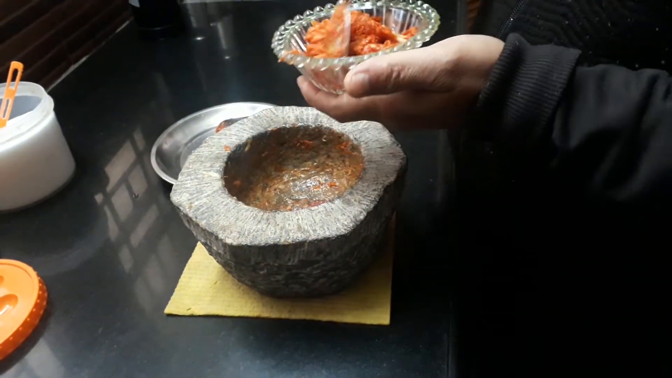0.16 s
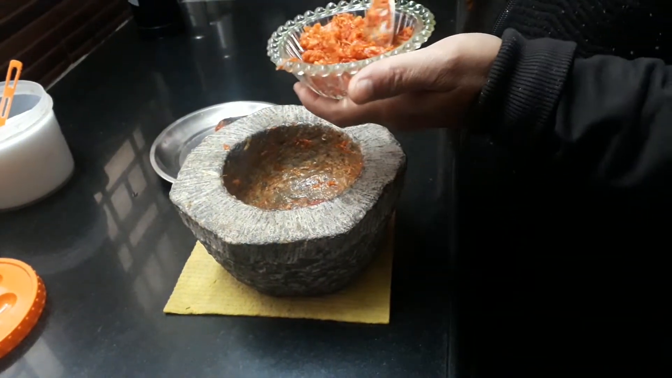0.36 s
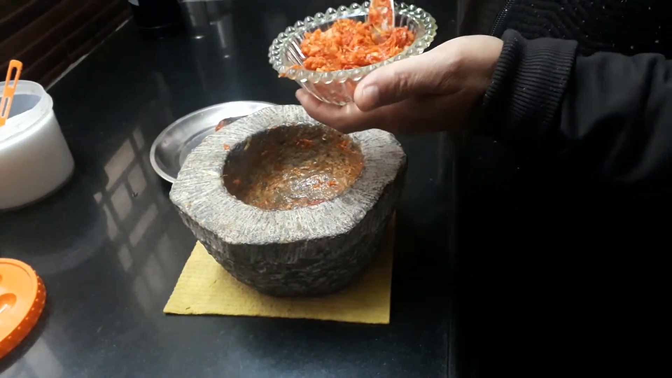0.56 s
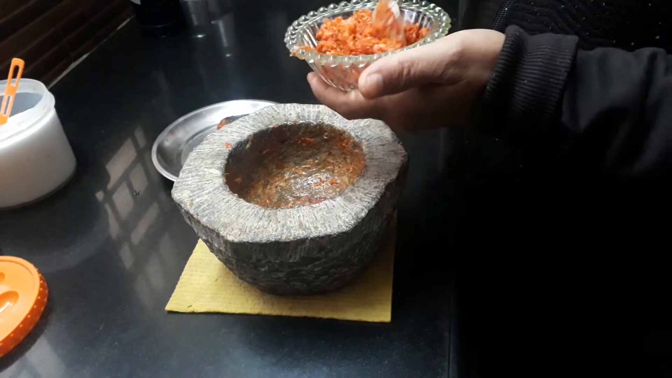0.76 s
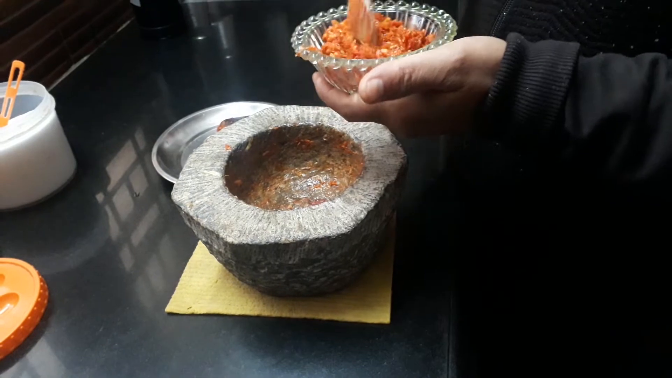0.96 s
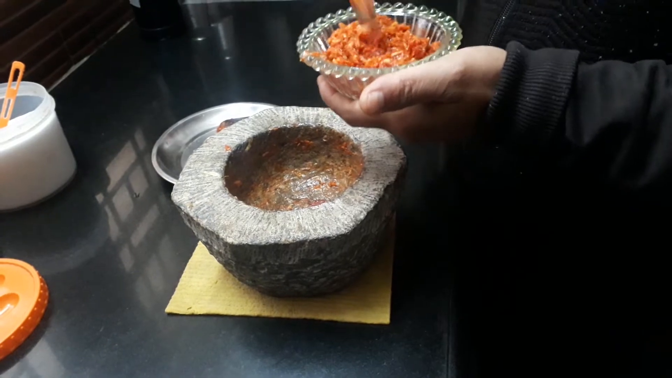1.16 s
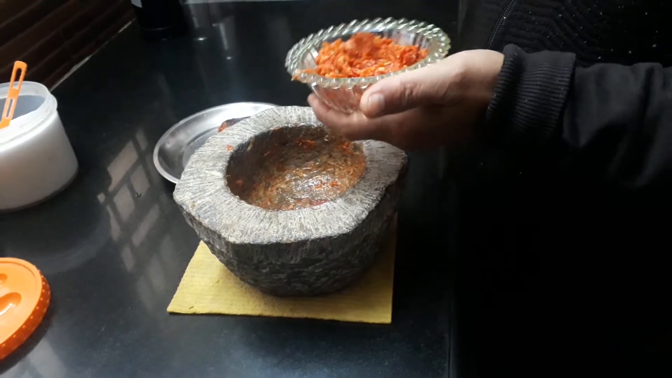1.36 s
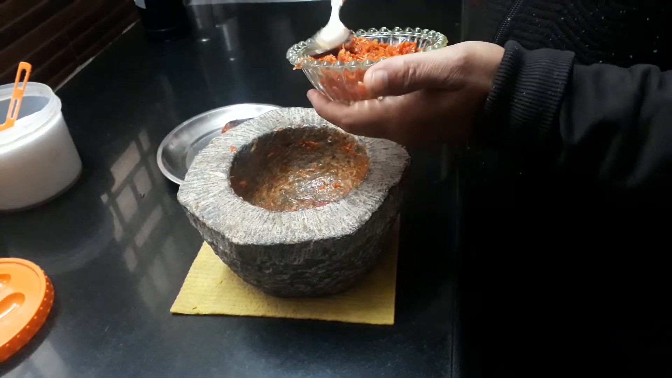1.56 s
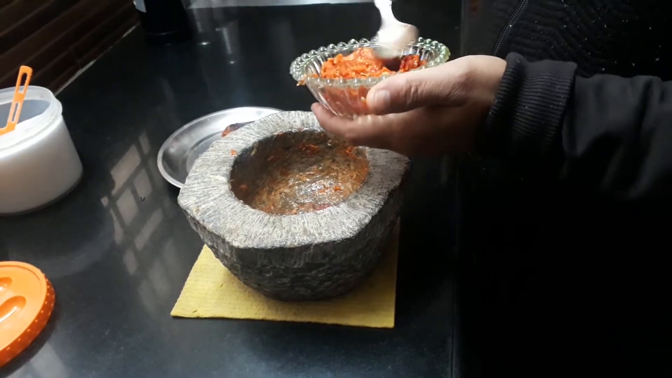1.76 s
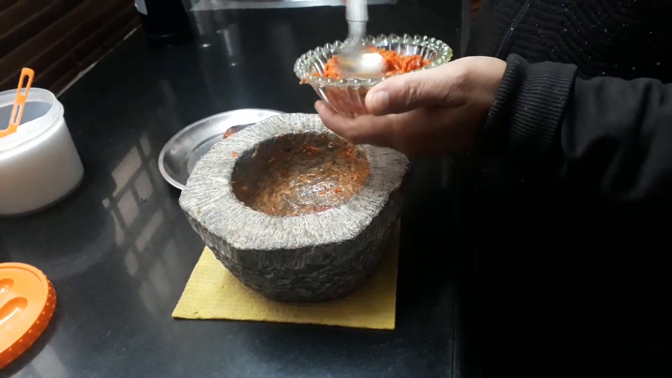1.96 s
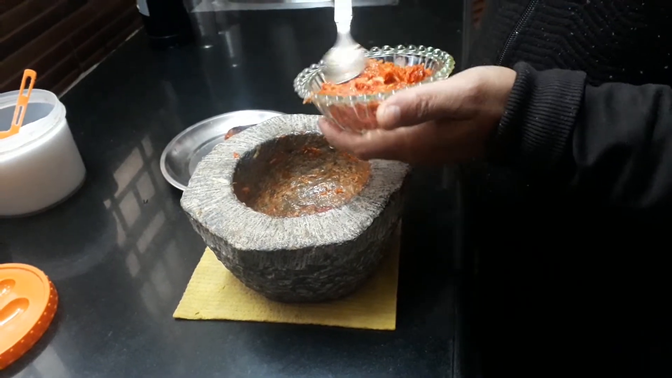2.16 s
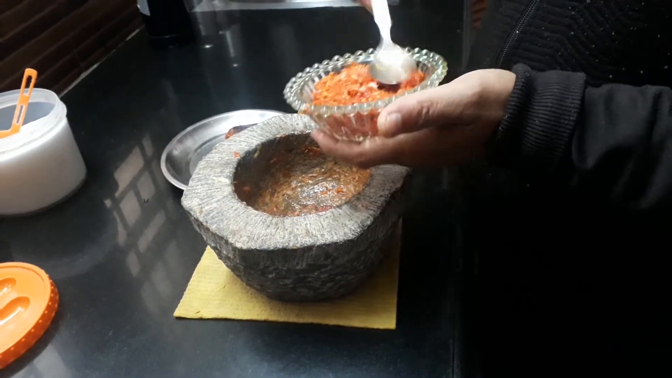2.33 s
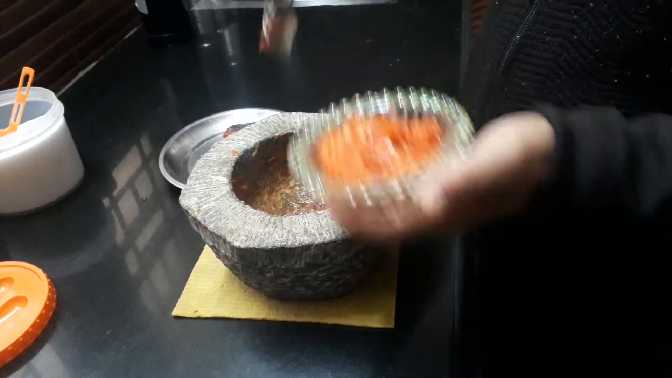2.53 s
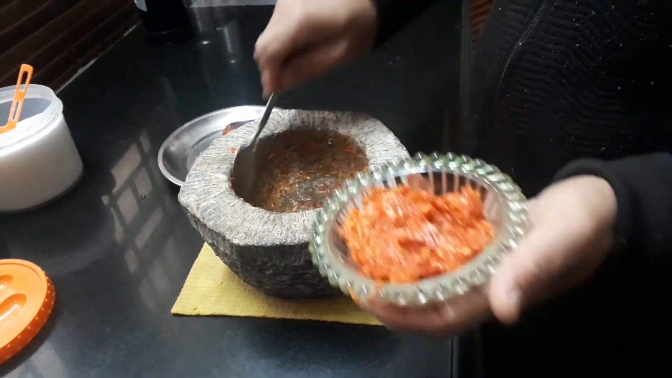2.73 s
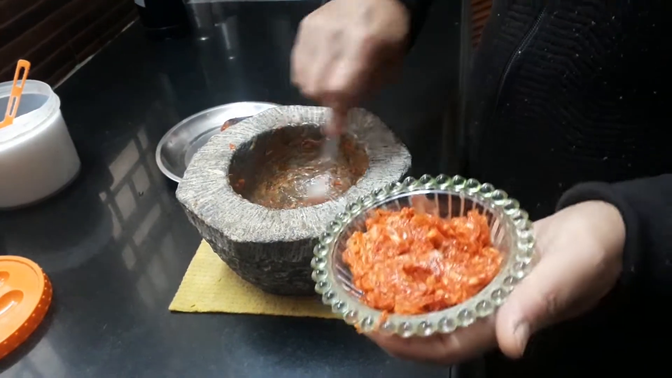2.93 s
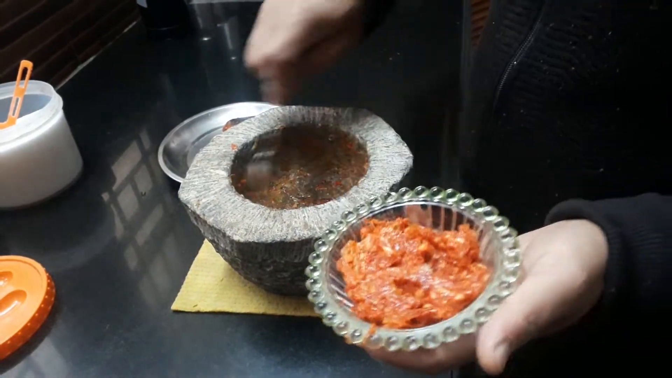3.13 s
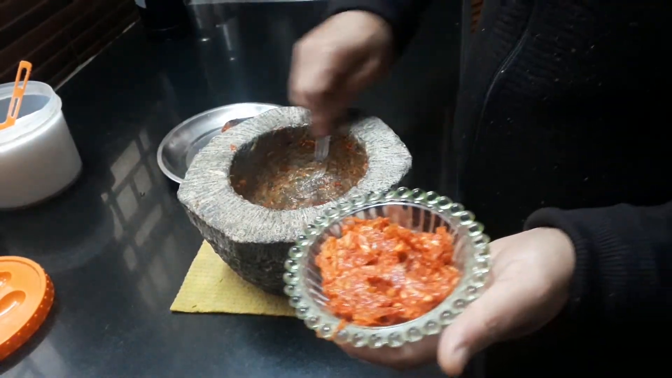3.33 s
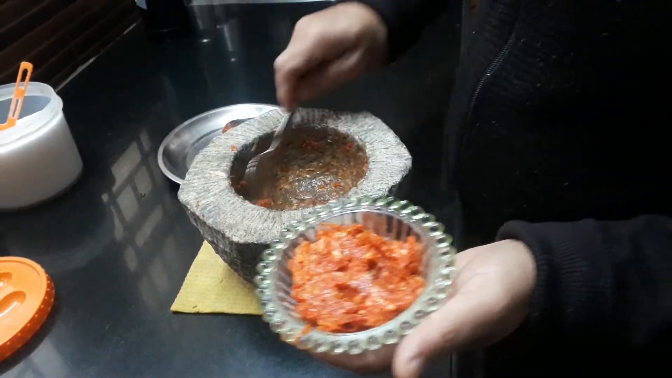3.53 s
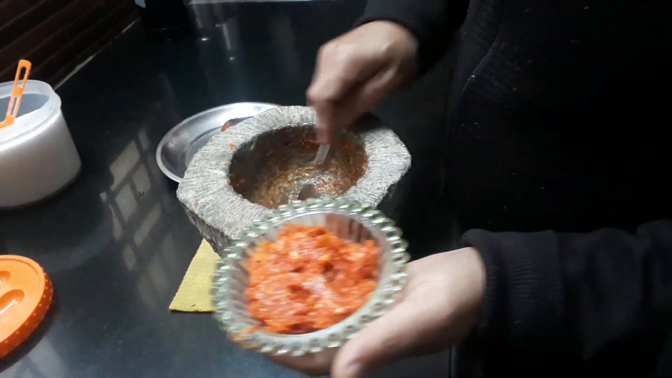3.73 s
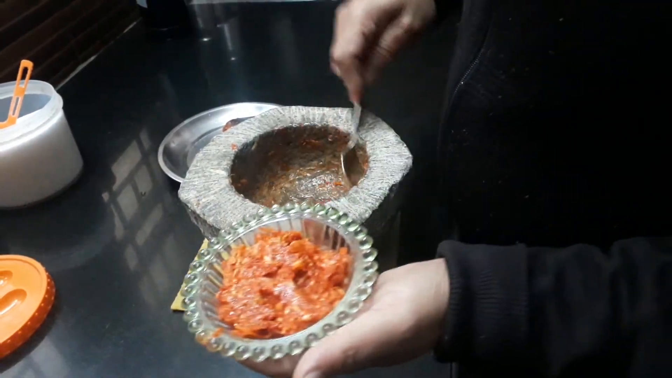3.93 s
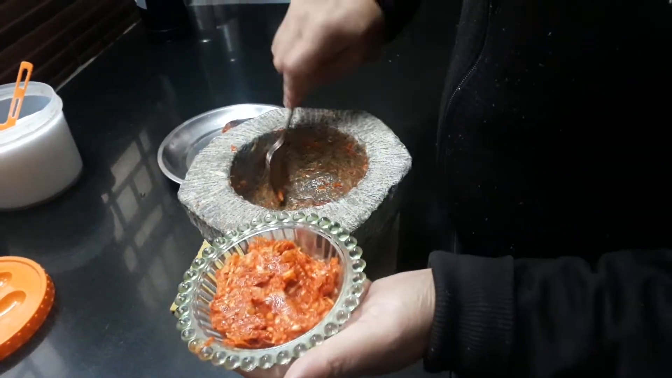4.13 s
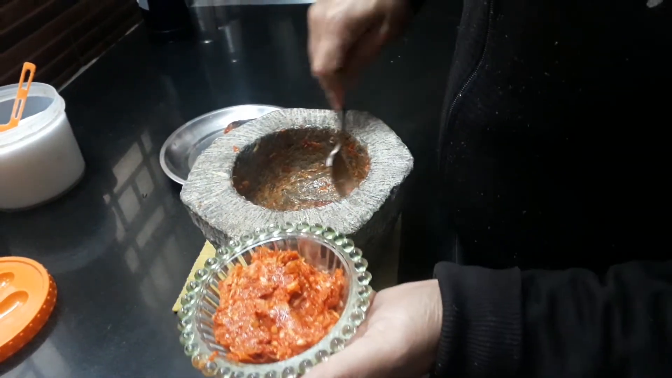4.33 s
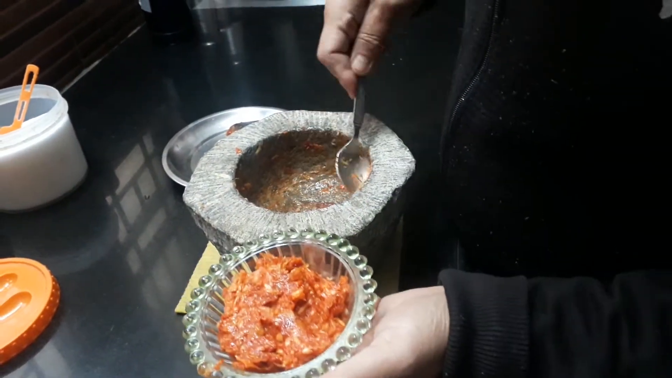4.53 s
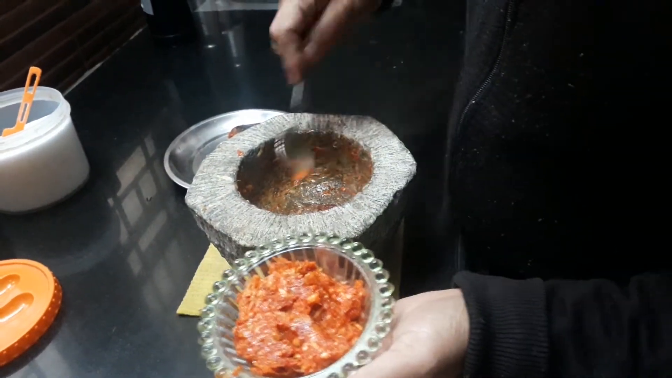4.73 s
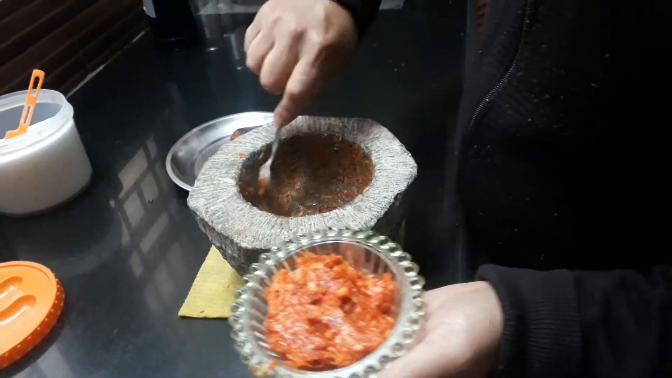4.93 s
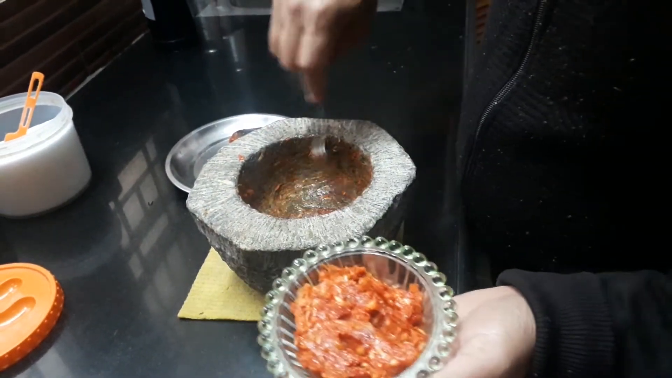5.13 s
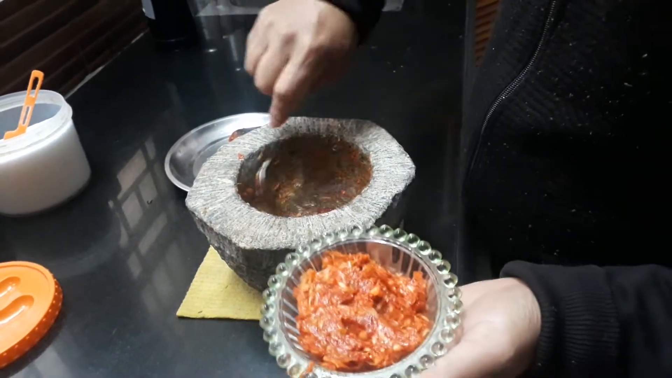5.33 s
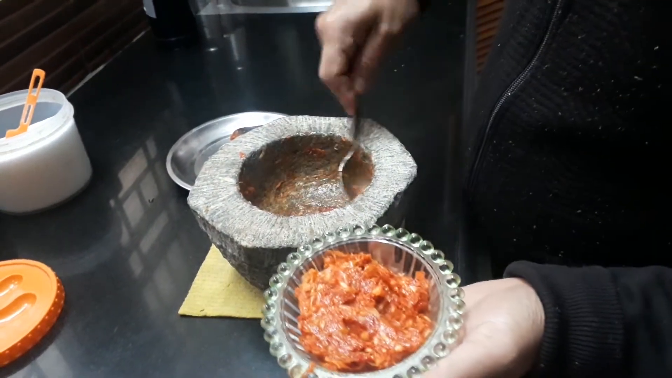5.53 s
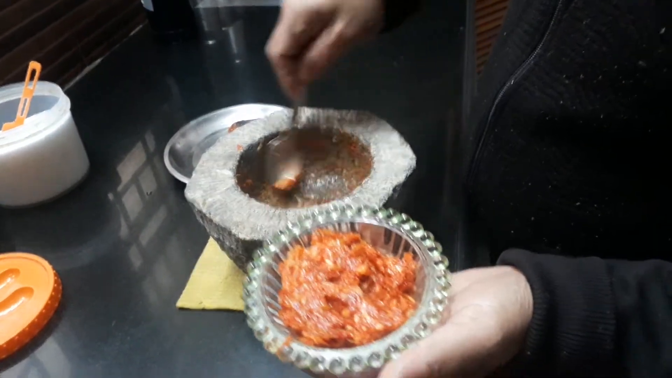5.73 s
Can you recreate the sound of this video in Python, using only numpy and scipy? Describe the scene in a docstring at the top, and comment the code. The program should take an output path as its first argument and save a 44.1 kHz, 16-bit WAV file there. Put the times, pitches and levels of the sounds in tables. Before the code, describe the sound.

In a small, hard-walled kitchen, a steel spoon clinks on a glass bowl once, then a few more times about two seconds in. It then scrapes round a stone mortar in about six short, gritty strokes, catching on the rough surface and ticking lightly between them. The later strokes are louder. The sound is fairly close, with soft dull thuds, a steady hiss and a low rumble behind.

```python
"""A small hard-walled kitchen: a steel spoon clinks on a hand-held glass bowl of paste, then
scrapes round a stone mortar, stroke after stroke. In each stroke it grinds over the grit and
catches on pits; between strokes its tip ticks on the stone. Each touch is a push and a chatter
of tiny impacts that ring the resonances of steel, stone or glass.
Dull thuds, a steady hiss and a low rumble lie behind."""
import sys
import numpy as np
from scipy import signal
from scipy.fft import rfft, irfft, next_fast_len
from scipy.io import wavfile

SR = 44100
rng = np.random.default_rng(int(sys.argv[2]) if len(sys.argv) > 2 else 0)


def wav_out(sig):
    """Save sig, one row per channel (or a flat mono array), as 16-bit PCM at SR to the path in sys.argv[1]."""
    wavfile.write(sys.argv[1], SR, np.round(np.clip(np.atleast_2d(sig).T, -1, 1) * 32767).astype(np.int16))


N = 259308
TIME = np.arange(N) / SR
HIT_TIME = TIME[:SR // 4]

# Table levels are relative; each layer sets its own gain.
# scraping strokes: (start [s], hardest press [s], end [s], level at that press [dB],
# swell up to it [dB], easing after it [dB], brightness at that press [dB], dulling [dB/s])
SCRAPE_STROKES = [(2.797, 2.817, 2.87, -39.5, 0, 2.5, 4.5, -2), (2.91, 2.97, 3.09, -24, 21, 14.5, -21, 100),
                  (3.319, 3.384, 3.43, -30, 1, 2, -11, 130), (3.666, 3.857, 4, -20.5, 18, 14.5, -16.5, 72),
                  (4.242, 4.329, 4.55, -24, 10, 5, -9, 17), (4.94, 5.075, 5.15, -17, 25, 17, -13.5, 20),
                  (5.371, 5.505, 5.63, -20, 20, 6.5, -9, 31)]
# the edge catches on a deep pit: (time [s], level [dB], brightness [dB], knock [dB], squeal [dB])
PIT_CATCHES = [(2.7993, -31, 10, -32, -27), (2.8393, -21, 2, -32, -18), (2.9158, -14.5, -3, -32, -24),
               (2.924, -14.5, 0, -8, -23), (2.961, -9, -35, -7.5, -30), (3.3157, -14.5, 18, -1, -16),
               (3.4436, -18.5, -20, -30, -5), (3.6762, -17, 0, -5, -6), (3.7465, -14.5, 6, -4.5, -6),
               (3.7837, -10.5, -42, -35, -6), (3.8068, -4, -11, -42, -4), (3.8325, -6, -20, -42, -25),
               (3.8578, -10.5, -9, -42, 5), (4.3565, -8.5, -9, -14, -16), (4.3846, -1, -10.5, -46, -4),
               (4.4242, -0.5, -6, -40, -17), (4.5043, -5.5, -8, -8, -33), (4.582, -9.5, -8, -7, -30),
               (4.6022, -8.5, -6, -4, -33.5), (4.9748, -19.5, -2, -6, -2), (5.005, -17, -8, -2.5, 5.5),
               (5.0655, -6, -16, -42, 0), (5.0889, -3, -11, -46, -5.5), (5.4988, -11, 15, -4.5, 9),
               (5.5529, -6, -28, -38, -15), (5.5898, -5, -4, -36, -19), (5.6045, -6, -2, -18, -23),
               (5.6153, -3.5, -2, -40, -25), (5.7807, -15, -6, -40, -30)]
# light ticks of the tip on stone: (time [s], level [dB], tilt [dB/octave], chatter decay [s])
TIP_TICKS = [(3.2058, -15, -2.5, 0.0068), (3.242, -24.5, -7, 0.0018), (3.5925, -12, 0, 0.0055),
             (4.1121, -17.5, -6, 0.006), (4.1831, -25.5, -12, 0.0018), (4.8688, -8.5, 1, 0.006),
             (5.3, -11, -3, 0.0036), (5.3298, -19.5, -8, 0.0021)]
# spoon on the glass bowl: (time [s], level [dB], tilt [dB/octave], low ring [dB])
BOWL_CLINKS = [(0.1743, -11, -1.5, -28), (0.1800, -24.5, 0.5, -9.5), (1.9436, -8.5, -1.5, -31),
               (2.093, -24.5, -1, -12.5), (2.1469, -20, -1, -7.5)]
# dull background thuds: (time [s], level [dB], depth [dB])
DULL_THUDS = [(0.021, -34.5, -4), (0.115, -31, -22), (0.37, -34.5, -23), (0.535, -35, -12),
              (0.678, -36.5, -28), (0.793, -37, -13), (0.94, -33.5, -21), (1.11, -32.5, -18),
              (1.542, -36, -28), (1.655, -31.5, -11), (1.79, -34.5, -8.5), (2.179, -30.5, -11.5),
              (2.446, -32, -30), (2.59, -33, -30), (2.698, -32, -10.5), (2.855, -37, -6),
              (2.947, -32.5, -20), (3.025, -32.5, -12), (3.201, -36.5, -4), (3.329, -33, -3.5),
              (3.575, -30.5, -3), (3.73, -31.5, -10.5), (3.851, -33.5, -12), (3.966, -38.5, -18),
              (4.068, -33, -14), (4.335, -29, -28), (4.469, -30, -12), (4.669, -35.5, -14),
              (4.818, -38, -4), (4.903, -32, -7.5), (5.031, -34.5, -16), (5.501, -37, -18), (5.83, -36, -9)]

# resonances, all as (frequency [Hz], width [Hz], level [dB])
STONE_MODES = [(864, 86, -20.5), (1985, 405, -6), (2480, 425, -2.5), (3067, 106, 0), (3267, 240, 0.5),
               (3853, 264, -1), (4000, 196, 5), (4250, 714, 2), (5044, 880, 0), (5420, 105, -2.5),
               (5760, 117, -2), (6220, 1720, -7), (7140, 1100, -8), (7760, 310, -5.5), (8500, 340, -12.5),
               (10300, 1800, -26), (13800, 3000, -42)]  # spoon and stone in contact
HOLLOW_MODES = [(866, 160, 23), (1460, 74, 16)]  # the mortar's cavity
SQUEAL_MODES = [(3200, 45, 12), (3330, 45, -5)]  # the sticking edge
TIP_MODES = [(2320, 1560, -19), (3315, 55, -5), (3740, 140, -10.5), (4400, 81, -2), (5230, 1060, -4.5),
             (6300, 800, 4), (6400, 1500, -3.5), (7400, 310, -2), (8850, 410, -6.5), (10240, 670, -5.5),
             (10900, 700, -4), (12200, 1100, -13.5), (15500, 860, -20)]  # the spoon's tip
STEEL_RING_MODES = [(4789, 11, 0), (4940, 35, -7)]  # the spoon's thin, lasting ring
BOWL_MODES = [(1920, 145, -16.5), (2650, 300, -10), (2910, 330, -11), (3470, 190, -15.5),
              (4400, 250, -14.5), (5040, 54, -2), (5330, 80, 2.5), (5450, 110, 7), (5650, 130, 6.5),
              (5800, 140, -4), (5970, 160, -9), (6630, 170, -7), (7600, 870, -19), (10150, 200, -15),
              (10620, 200, -17), (12400, 40, -14), (13450, 60, -22), (14950, 150, -27)]  # the damped glass
BOWL_RING_MODES = [(2294, 49, 0)]  # the glass's low ring
THUD_MODES = [(157, 80, -16), (297, 36, 4.5), (430, 330, -21), (490, 79, -22), (850, 60, -17)]  # the low body of a thud
# how freely the spoon rings: (time [s], level [dB])
RING_FREEDOM = [(2.8, 19), (3.0, 15), (3.3, -5), (4.2, 6), (5.6, 10.5)]

# the kitchen's reverb: (frequency [Hz], time to fall 60 dB [s], level [dB])
KITCHEN_REVERB = [(153, 0.99, 7.5), (504, 0.15, -1), (935, 0.53, 6), (2310, 0.3, 0.5), (4970, 0.53, -10),
                  (8550, 0.32, -3.5), (15000, 0.073, -16)]
# tone of the two background noises: (frequency [Hz], spectral level [dB])
HISS_SPECTRUM = [(590, -11), (1000, -23.5), (1080, -14), (1150, -10.5), (1730, -6), (2080, -2), (2530, -7),
                 (2740, -7), (4120, -11), (5830, -9.5), (7100, 1.5), (8260, -5.5), (9600, -17.5),
                 (13600, -9), (16000, -23)]
RUMBLE_SPECTRUM = [(25, -20), (42, -18), (60, -6), (85, -1), (120, -9), (170, -1), (290, 3.5), (420, -0.5),
                   (680, -11), (950, -8), (1300, -18), (2500, -79)]


def scraping(grains_per_s=3200, spread_db=3.0, slip_db=4.0, slips_per_s=150,
             level_db=-6, slide_db=3.5, slides_per_s=45, squeal_db=-13):
    """The spoon runs over grit: random tiny impacts, bunched by stick and slip, with a faint squeal."""
    pressure, bright_db = pressing()
    grains = (rng.random(N) < grains_per_s / SR) * rng.choice([-1, 1], N)
    grain_size = from_db(spread_db * np.minimum(rng.exponential(1, N), 4))
    stick_slip = from_db(slip_db * drift(slips_per_s))
    body_gain = np.linalg.norm(resonate(HIT_TIME == 0, STONE_MODES))
    force = rms_one(grains * grain_size * stick_slip) * pressure * from_db(level_db) / body_gain
    edge = edge_colour(bright_db)
    # the point of contact slides along the rim, so the resonances swell and fade in turn
    grinding = resonate(force, STONE_MODES, lambda hz: edge(hz) + slide_db * drift(slides_per_s))
    return grinding + from_db(squeal_db) * resonate(force, SQUEAL_MODES)


def pressing(fade_s=0.012):
    """Each stroke swells to its hardest press and eases off, mostly dulling: gain, brightness in dB."""
    gain, brightness = np.zeros(N), np.zeros(N)
    for start, hardest, end, db, swell_db, ease_db, bright_db, dulling in SCRAPE_STROKES:
        touching = np.clip(1 + np.minimum(TIME - start, end - TIME) / fade_s, 0, 1)
        gain += touching * from_db(db - np.interp(TIME, [start, hardest, end], [swell_db, 0, ease_db]))
        brightness += (touching > 0) * (bright_db - dulling * (TIME - hardest))
    return gain, brightness


def edge_colour(bright_db, neutral_db=-10.0, corner_hz=6000, steepness=5.7):
    """A sharper edge on the stone drives the upper resonances harder: a treble shelf in dB."""
    return lambda hz: (bright_db - neutral_db) / (1 + (corner_hz / hz) ** steepness)


def catches(level_db=-5.0, knock_trim_db=-11, squeal_trim_db=-3, chatter_s=0.0061):
    """The edge snags; some catches add a hollow knock from the mortar, a sticking edge squeals."""
    out = np.zeros(N)
    for s, db, bright_db, knock_db, squeal_db in PIT_CATCHES:
        force = contact(chatter_s, rough=1.09)
        spoon = strike(force, touch_point(STONE_MODES), edge_colour(bright_db))
        hollow = from_db(knock_db + knock_trim_db) * strike(force, HOLLOW_MODES)
        squeal = from_db(squeal_db + squeal_trim_db) * strike(force, SQUEAL_MODES)
        add(out, s, from_db(db + level_db) * (spoon + hollow + squeal))
    return out


def ticks(level_db=-3):
    """The tip touches the stone on its way back: short and bright."""
    out = np.zeros(N)
    for s, db, tilt, chatter_s in TIP_TICKS:
        force = contact(chatter_s, rough=0.91)
        tick = strike(force, touch_point(TIP_MODES), lambda hz: tilt * np.log2(hz / SR))
        add(out, s, from_db(db + level_db) * tick)
    return out


def steel_ring(touches):
    """Every touch of the stone also feeds the thin, lasting ring of the steel."""
    freedom = from_db(np.interp(TIME, *np.transpose(RING_FREEDOM)))
    return resonate(touches * freedom, STEEL_RING_MODES)


def clinks():
    """Glass damped by paste and palm; a soft touch favours its low ring."""
    out = np.zeros(N)
    for s, db, tilt, ring_db in BOWL_CLINKS:
        force = contact(chatter_s=.004, rough=.5)
        bowl = strike(force, BOWL_MODES, lambda hz: tilt * np.log2(hz / SR))
        low_ring = from_db(ring_db) * strike(force, BOWL_RING_MODES)
        add(out, s, from_db(db) * (bowl + low_ring))
    return out


def thuds(level_db=2.5, neutral_depth_db=-13, bass_hz=210, slap_s=.02, slap_db=-4):
    """Soft low knocks, some deeper than others, each followed by a slap off the wall."""
    out = np.zeros(N)
    for s, db, depth_db in DULL_THUDS:
        force = contact(chatter_s=.004, rough=.3)
        body = touch_point(THUD_MODES, spread_db=1.5, detune=.02)
        bass_db = depth_db - neutral_depth_db
        thud = from_db(db + level_db) * strike(force, body, lambda hz: (hz < bass_hz) * bass_db)
        add(out, s, thud)
        add(out, s + slap_s, from_db(slap_db) * thud)
    return out


def kitchen(send, first_echo_s=0.0035, build_s=0.0019):
    """Dense reflections off hard walls die away band by band."""
    t = TIME[:SR * 3 // 5]
    edges_hz = np.geomspace(70, 17000, 12)
    onset = np.clip((t - first_echo_s) / build_s, 0, 1)
    white = rng.standard_normal((2, len(t)))
    tail = 0
    for k, (low, high) in enumerate(zip(edges_hz, edges_hz[1:])):
        t60, db = at_hz(KITCHEN_REVERB, np.sqrt(low * high))
        envelope = onset * np.exp(-np.log(1000) * t / t60)
        band = signal.sosfilt(signal.butter(2, [low, high], "band", fs=SR, output="sos"), white[k % 2])
        tail = tail + from_db(db) * band * envelope / np.linalg.norm(envelope)
    return signal.fftconvolve(send, tail)[:N]


def room_tone(hiss_db=-44.5, rumble_db=-51.5):
    """A steady bed of hiss over a low rumble."""
    hiss = from_db(hiss_db) * coloured_noise(HISS_SPECTRUM)
    rumble = from_db(rumble_db) * coloured_noise(RUMBLE_SPECTRUM)
    return hiss + rumble


def contact(chatter_s, rough):
    """One sharp push, then a dying chatter of tiny ones; rough is their joint strength."""
    chatter = rng.standard_normal(len(HIT_TIME)) * np.exp(-HIT_TIME / chatter_s)
    return (HIT_TIME == 0) + rough * chatter / np.linalg.norm(chatter)


def touch_point(modes, spread_db=1.0, detune=0.0096):
    """Where a hit lands sets how strongly each resonance is fed, and bends its pitch."""
    chance = rng.standard_normal((len(modes), 2))
    return [(hz * (1 + detune * bend), width, db + spread_db * feed)
            for (hz, width, db), (bend, feed) in zip(modes, chance)]


def strike(force, modes, colour=lambda hz: 0, crest=3.07):
    """A struck body's ring, scaled on its first 7 ms to peak near 1."""
    ring = resonate(force, modes, colour)
    attack = ring[HIT_TIME < .007]
    return ring / (crest * np.sqrt(np.mean(attack ** 2)))


def resonate(force, modes, colour=lambda hz: 0):
    """Parallel resonances of alternating sign; colour(hz) is how hard each is driven, in dB."""
    out = 0
    for k, (hz, width, db) in enumerate(modes):
        r, w = np.exp(-np.pi * width / SR), 2 * np.pi * hz / SR  # pole radius and angle
        drive = force * from_db(db + colour(hz)) + 1e-18
        ring = signal.lfilter(np.array([1, 0, -1]) * (1 - r * r) / 2, [1, -2 * r * np.cos(w), r * r], drive)
        out = out + (-1) ** k * ring
    return out


def drift(per_s):
    """A random wander of spread about 1."""
    return np.interp(TIME * per_s, np.arange(4000), rng.standard_normal(4000))


def coloured_noise(spectrum):
    """Steady noise of a given spectrum, rms 1."""
    size = next_fast_len(N)
    db, = at_hz(spectrum, np.maximum(np.fft.rfftfreq(size, 1 / SR), 1))
    return rms_one(irfft(rfft(rng.standard_normal(size)) * from_db(db), size)[:N])


def at_hz(points, hz):
    """Read each column of a table along log frequency."""
    known_hz, *columns = np.transpose(points)
    return [np.interp(np.log(hz), np.log(known_hz), column) for column in columns]


def from_db(db):
    """Decibels to gain."""
    return 10 ** (np.asarray(db) / 20)


def rms_one(x):
    """Scale to rms 1."""
    return x / np.sqrt(np.mean(x ** 2) + 1e-20)


def add(out, s, sound):
    """Mix a sound in at s seconds."""
    at = round(s * SR)
    out[at:at + len(sound)] += sound[:N - at]


def scene(tick_send_db=0.5, clink_send_db=3.5, thud_send_db=-0.5):
    """Spoon, bowl and thuds share one reverb over the room tone, in mono."""
    mortar = scraping() + catches()
    tip, glass, knocks = ticks(), clinks(), thuds()
    mortar = mortar + steel_ring(mortar + tip)
    send = (mortar + from_db(tick_send_db) * tip + from_db(clink_send_db) * glass
            + from_db(thud_send_db) * knocks)
    return (mortar + tip + glass + knocks + kitchen(send) + room_tone())[None]


def record(dry, low_cut_hz=62, high_cut_hz=16000):
    """The microphone loses the deep bass; the top is cut steeply."""
    thin = signal.sosfilt(signal.butter(2, low_cut_hz, "high", fs=SR, output="sos"), dry)
    return signal.sosfilt(signal.ellip(10, .1, 80, high_cut_hz, fs=SR, output="sos"), thin)


dry = scene()
out = record(dry)
wav_out(out)
```